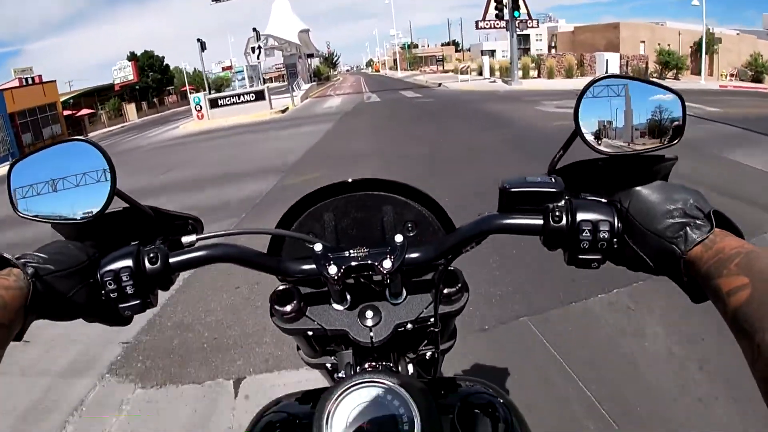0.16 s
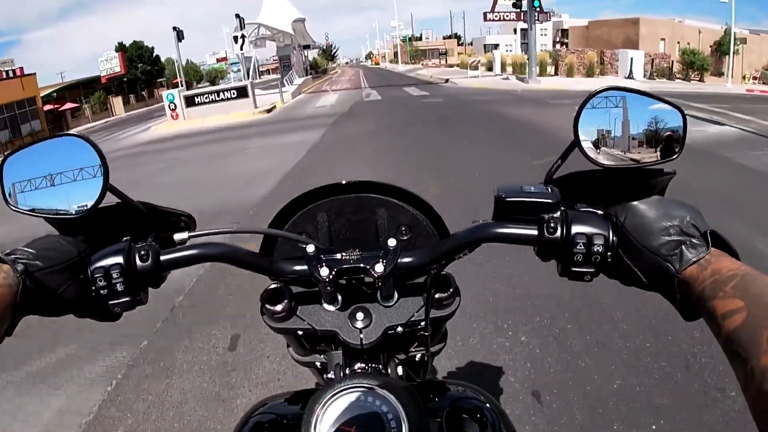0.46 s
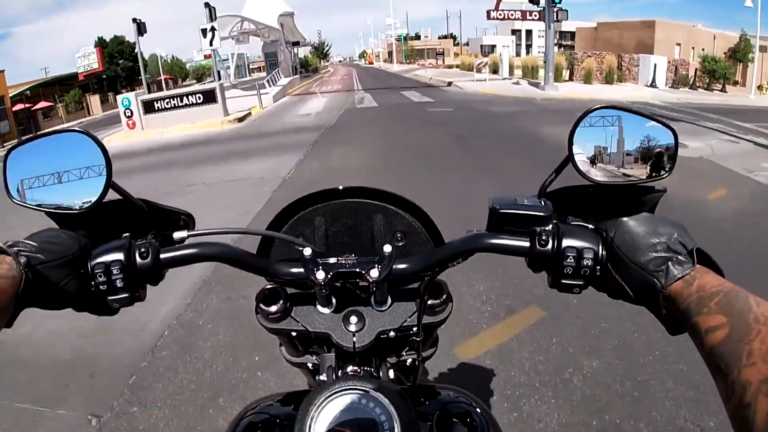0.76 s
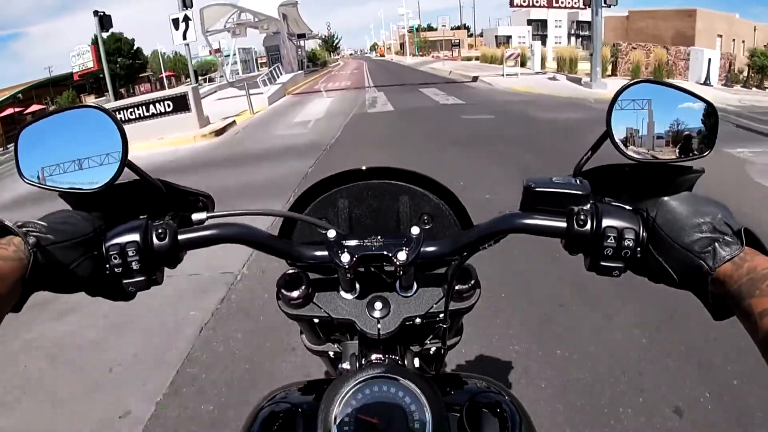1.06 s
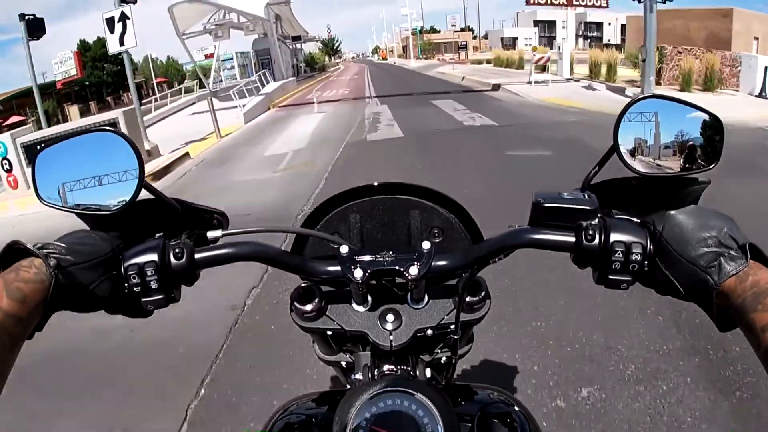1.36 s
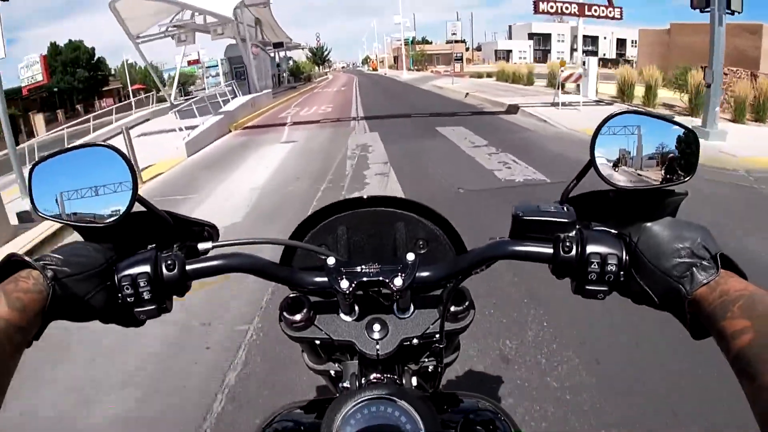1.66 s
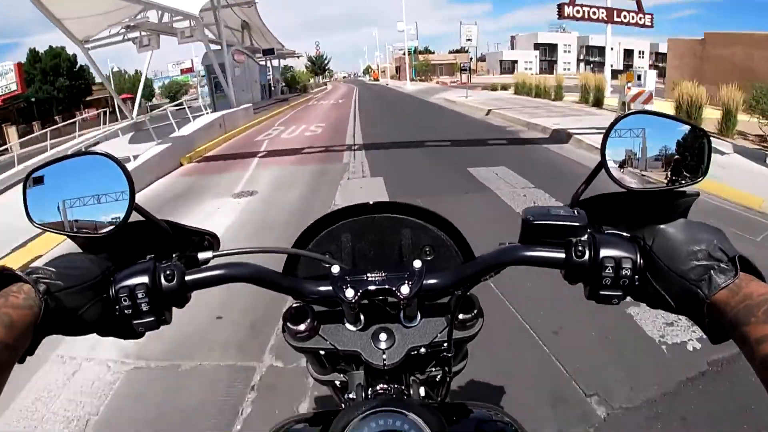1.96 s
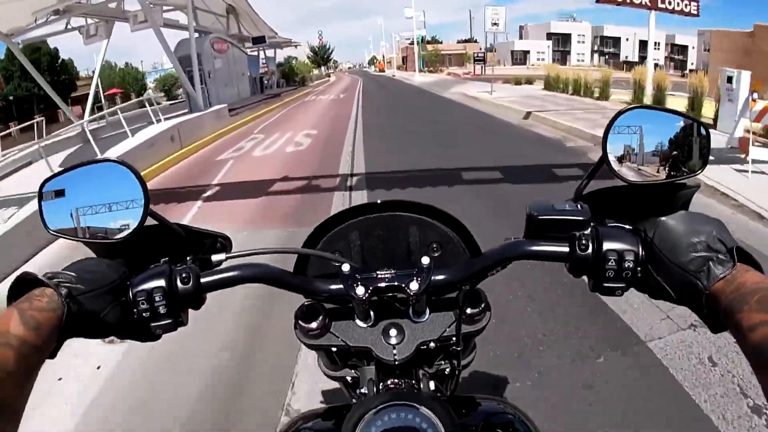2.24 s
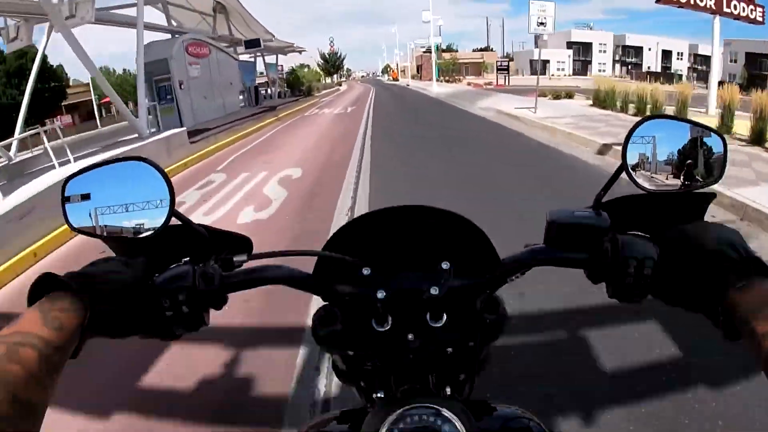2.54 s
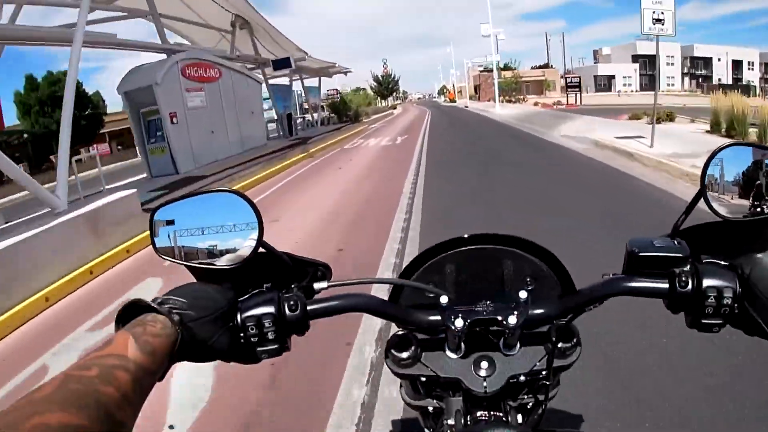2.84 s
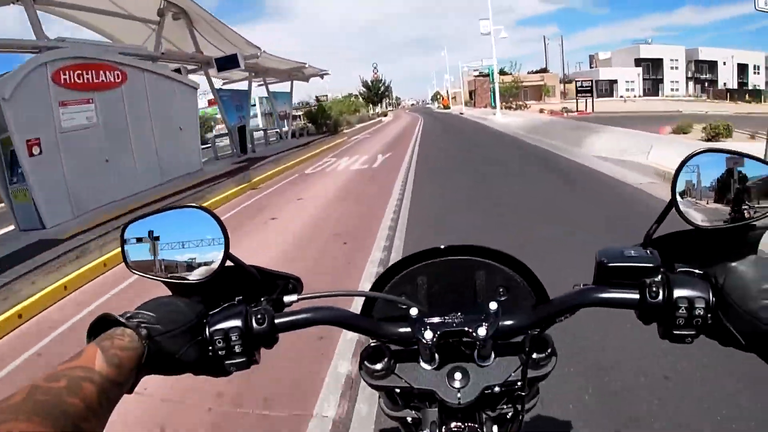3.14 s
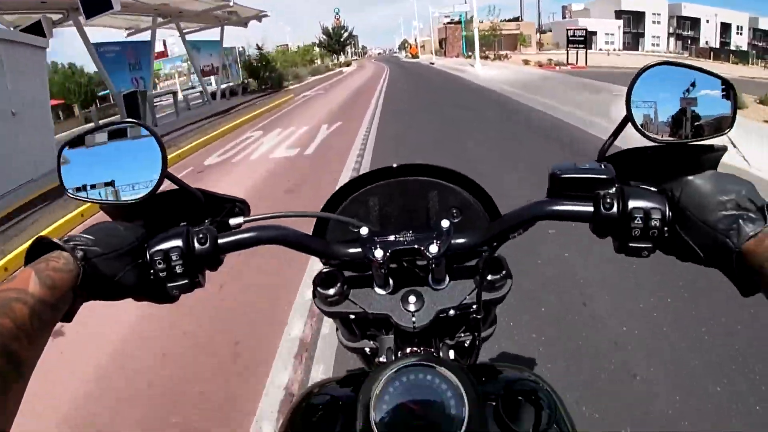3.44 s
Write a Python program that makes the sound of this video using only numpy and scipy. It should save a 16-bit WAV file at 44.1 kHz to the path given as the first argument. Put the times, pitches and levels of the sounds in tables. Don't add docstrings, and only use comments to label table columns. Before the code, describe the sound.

A big V-twin motorcycle dips briefly, then accelerates with uneven, booming exhaust beats. A second bike ticks and thumps alongside, then drops back. Wide open street, muffled close microphone in the rider's helmet, low wind and road roar.

```python
import sys
import numpy as np
from scipy import signal
from scipy.io import wavfile

SR = 44100
rng = np.random.default_rng(int(sys.argv[2]) if len(sys.argv) > 2 else 0)


def to_wav(s):
    ch = np.atleast_2d(s).T
    pcm = np.round(np.clip(ch, -1, 1) * 32767)
    wavfile.write(sys.argv[1], SR, pcm.astype(np.int16))


def attenuation_scalar(level_db):
    decades = np.asarray(level_db, float) / 20
    return 10 ** decades


N = 158760
MID_SPEED = 23
PIPES_DB, RASP_T60_S, RASP_TOP_HZ = 0.6, 0.053, 1730

# start_s, speed [four-stroke cycles per s]
OWN_SPEED = [(0.0, 14.255), (0.2, 13.282), (0.4, 12.773), (0.65, 13.299), (0.9, 13.323), (1.05, 13.985),
             (1.2, 15.125), (1.4, 16.398), (1.6, 17.247), (1.8, 18.465), (2.1, 20.194), (2.4, 21.823),
             (2.7, 23.494), (3.0, 25.316), (3.15, 26.089), (3.3, 26.918), (3.45, 27.571), (3.6, 28.444)]
# pitch_hz (when slow), t60_s,
# pitch_rise [share, as the gas heats], height_slow, height_middle, height_fast [signed]
FRONT_MODES = [(66.9, 0.074, 0.25, -0.332, -0.152, -0.135), (94.5, 0.056, 0.2, 0.507, 0.446, 0.47),
               (143.5, 0.084, 0.27, 0.255, 0.078, 0.112), (174.6, 0.043, 0.06, -0.29, -0.347, -0.396),
               (239.1, 0.03, 0.5, -0.277, -0.387, 0.011), (294.9, 0.04, 0.13, -0.095, 0.732, 0.263),
               (316.4, 0.049, 0.29, 0.339, -0.143, -0.056), (435.2, 0.031, 0.2, -0.047, 0.092, 0.179),
               (520.0, 0.057, 0.32, 0.026, -0.013, -0.121), (619.5, 0.053, 0.2, -0.016, 0.068, 0.045),
               (692.9, 0.026, 0.16, 0.104, -0.013, 0.048), (908.1, 0.031, 0.18, 0.041, 0.007, 0.015)]
REAR_MODES = [(65.8, 0.087, 0.2, -0.114, -0.09, 0.058), (91.1, 0.088, 0.2, 0.224, 0.223, 0.163),
              (157.3, 0.067, 0.03, 0.16, 0.171, 0.185), (166.7, 0.113, 0.18, -0.224, -0.176, -0.123),
              (209.0, 0.066, 0.21, -0.224, -0.226, -0.045), (251.0, 0.059, 0.2, 0.222, 0.282, 0.198),
              (351.0, 0.041, 0.16, -0.072, -0.057, -0.007), (415.7, 0.033, 0.2, 0.002, 0.066, 0.167),
              (500.0, 0.044, 0.2, 0.008, -0.119, -0.144), (606.6, 0.04, 0.2, -0.046, 0.047, 0.047),
              (634.5, 0.092, 0.03, -0.011, 0.003, -0.022), (808.9, 0.091, 0.1, -0.003, -0.004, -0.026)]
# pitch_hz, level_db [per Hz]
RASP_COLOUR = [(250, -40.5), (420, -13.5), (455, -6.5), (554, -7.5), (659, -6.5), (835, -11), (1640, -21.5),
               (2100, -34.5), (2730, -48), (4620, -120)]


def cylinder(share, modes):
    fired = moments(OWN_SPEED, -.3641, share)
    slow, fast = 13, 28
    along = (np.interp(fired, *np.transpose(OWN_SPEED)) - slow) / (fast - slow)
    strength_db = 2 * rng.standard_normal(len(fired))
    return attenuation_scalar(PIPES_DB) * blow(fired, along, modes), train(fired, attenuation_scalar(strength_db))


def own_bike():
    front, front_clicks = cylinder(0, FRONT_MODES)
    rear, rear_clicks = cylinder(.3868, REAR_MODES)
    faster = in_time(OWN_SPEED) - MID_SPEED
    bursts = puff(front_clicks + rear_clicks, RASP_T60_S)
    rasp = attenuation_scalar(-43 - 0.28 * faster) * bursts * coloured(RASP_COLOUR, patchy_db=3)
    engine_cover = cover(3800, width_hz=240, level_db=-68.5)
    silencer = cover(1700, width_hz=120, level_db=-66)
    singing = attenuation_scalar(1.3 * faster) * (engine_cover + silencer)
    return front + rear + low_pass(rasp, RASP_TOP_HZ) + singing


# start_s, speed [cycles per s]
OTHER_SPEED = [(0.0, 17.69), (0.3, 17.707), (0.6, 18.06), (0.9, 18.451), (1.2, 18.963), (1.4, 18.835),
               (1.6, 18.75), (1.9, 18.309), (2.2, 19.691), (2.6, 20.976), (3.1, 22.459), (3.6, 24.175)]


def other_firings():
    return np.concatenate([other_moments(share) for share in (0, .427)])


def other_moments(share):
    return moments(OTHER_SPEED, -.3444, share)


# share [of a cycle], level_db
VALVE_TICKS = [
    (.097, .1),
    (.301, -2),
    (.511, -1.5),
    (.696, -1.5),
]


def tick_gate():
    clicks = 0
    for share, db in VALVE_TICKS:
        s = other_moments(share)
        late_s = .0004 * rng.standard_normal(len(s)) - .002
        clicks = clicks + train(s + late_s, attenuation_scalar(db + 1.5 * rng.standard_normal(len(s))))
    return puff(clicks, t60=.018)


# pitch_hz, t60_s, pitch_rise [share],
# height_near, height_halfway, height_far [signed]
OTHER_MODES = [(90.8, 0.12, 0.2, 0.092, 0.039, 0.039), (159.4, 0.12, 0.03, 0.012, -0.024, 0.013),
               (208.0, 0.119, 0.19, 0.057, 0.022, 0.007), (261.2, 0.014, 0.17, -0.44, -0.205, -0.036),
               (304.0, 0.064, 0.11, 0.093, 0.032, 0.003), (438.1, 0.008, 0.29, -0.264, -0.283, -0.079),
               (611.5, 0.035, 0.03, -0.107, -0.094, -0.031), (630.0, 0.022, 0.12, 0.113, -0.032, -0.041),
               (696.4, 0.044, 0.15, 0.034, -0.003, 0.019), (737.4, 0.029, 0.03, 0.034, 0.081, 0.019)]
# pitch_hz, t60_s, height
SHELL = [
    (178.3, 0.18, -0.053),
    (309, 0.23, 0.028),
]


def other_exhaust(fired, change_db):
    thumps = attenuation_scalar(PIPES_DB) * blow(fired, fired / 3, OTHER_MODES)
    gas = low_pass(coloured(RASP_COLOUR, patchy_db=2), RASP_TOP_HZ)
    rasp = attenuation_scalar(-43.5 + 1.27 * change_db) * puff(train(fired, 1), RASP_T60_S) * gas
    near = train(fired, np.clip(1 - (fired / 2.85) ** 2, 0, 1))
    shell = sum(height * ring(near, hz, t60) for hz, t60, height in SHELL)
    return thumps + rasp + shell


# start_s, level_db
OTHER_LEVEL = [
    (0.1, -52),
    (0.59, -52),
    (1.96, -55),
    (2.12, -56.5),
    (3.21, -65),
    (3.5, -63.5),
]
# pitch_hz, level_db [per Hz]
TICK_COLOUR = [(1240, -34), (2100, -7.5), (2900, -9), (3550, -6.5), (4000, -8), (4590, -4), (6550, -7.5),
               (7700, -15), (8900, -9), (10100, -28.5), (13100, -47), (22000, -120)]
CLATTER_COLOUR = [(1240, -39.5), (2100, -8), (3300, -12), (3760, -9), (4170, -11), (5200, -10),
                  (6400, -11.5), (7600, -16), (8950, -18.5), (10000, -31.5), (13000, -42.5), (22000, -120)]
# pitch_hz, width_hz, level_db
ROCKER_COVERS = [
    (6460, 830, -67),
    (8900, 900, -76),
]


def other_bike():
    level_db = in_time(OTHER_LEVEL)
    change_db = level_db - level_db.mean()
    gate = tick_gate()
    valves = attenuation_scalar(level_db - 2) * gate * coloured(TICK_COLOUR, patchy_db=2)
    clatter = attenuation_scalar(-62 + 0.54 * change_db) * coloured(CLATTER_COLOUR, patchy_db=2)
    rockers = (0.48 + 0.79 * gate) * sum(cover(*row) for row in ROCKER_COVERS)
    swell_db = 7.5 * np.exp(-((np.arange(N) / SR - .7) / 0.22) ** 2)
    singing = attenuation_scalar(change_db + swell_db) * (0.4 + 0.13 * gate) * cover(3550, width_hz=380, level_db=-64)
    return valves + other_exhaust(other_firings(), change_db) + rockers + clatter + singing


def wind():
    buffet = rms_one(low_pass(rng.standard_normal(N + SR), 40)[SR:])
    faster = in_time(OWN_SPEED) - MID_SPEED
    return attenuation_scalar(-39.5 - 0.5 * faster + 3 * drift(5.4)) * buffet


# pitch_hz, level_db [per Hz]
ROAR_COLOUR = [(12, -32), (20, -24), (97, -20.5), (177, -20), (311, -4), (442, -12), (640, -10),
               (1290, -26), (2100, -45), (2730, -84.5), (4620, -120)]


def road():
    return attenuation_scalar(-36) * low_pass(coloured(ROAR_COLOUR, patchy_db=3), 1730)


def moments(speed, start_cycle, share):
    cycles = start_cycle + np.cumsum(in_time(speed)) / SR
    return np.interp(np.arange(-1, 90) + share, cycles, np.arange(N) / SR, -1, -1)


def blow(s, along, modes):
    chance = rng.standard_normal((len(s), 2 + len(modes)))
    s, along = s + .00004 * chance[:, 0], np.clip(along, 0, 1)
    after = np.arange(SR // 12) / SR
    rise = 1 - np.exp(-after / .002)
    rings = 0
    for k, (hz, t60, pitch_rise, *heights) in enumerate(modes):
        spread_db = .6 * chance[:, 1] + .6 * chance[:, 2 + k]
        height = np.interp(along, [0, .5, 1], heights) * attenuation_scalar(spread_db)
        tone = np.sin(2 * np.pi * hz * np.outer(1 + pitch_rise * along, after))
        rings = rings + height[:, None] * tone * attenuation_scalar(-60 * after / t60) * rise
    at = np.round(s * SR).astype(int)[:, None] + np.arange(len(after))
    heard = (at >= 0) & (s > -.5)[:, None]
    return low_pass(np.bincount(at[heard], rings[heard], N + SR)[:N], 1370)


def cover(hz, width_hz, level_db):
    t60 = 2.2 / width_hz
    singing = ring(ring(rng.standard_normal(N), hz, t60), hz, t60)
    return attenuation_scalar(level_db + 2.5 * drift(25)) * rms_one(singing)


def train(s, gain):
    at = np.round(s * SR).astype(int)
    inside = (at >= 0) & (at < N)
    return np.bincount(at[inside], (gain + 0 * s)[inside], N) + 1e-18


def ring(clicks, hz, t60):
    r, w = attenuation_scalar(-60 / (t60 * SR)), 2 * np.pi * hz / SR
    return signal.lfilter([0, np.sin(w)], [1, -2 * r * np.cos(w), r * r], clicks)


def puff(clicks, t60):
    r = attenuation_scalar(-60 / (t60 * SR))
    risen = signal.lfilter([1], [1, -2 * r ** 3, r ** 6], clicks)
    return rms_one(signal.lfilter([1], [1, -r], risen))


def coloured(spectrum, patchy_db):
    hz, db = np.transpose(spectrum)
    edges = hz[0] * 2 ** np.arange(0, np.log2(hz[-1] / hz[0]), 1 / 3)
    white, out = rng.standard_normal((2, N)), 0
    for k, (low, high) in enumerate(zip(edges, edges[1:])):
        sos = signal.butter(2, [low, high], "band", fs=SR, output="sos")
        band = signal.sosfilt(sos, white[k % 2])
        level_db = np.interp(np.log(low * high) / 2, np.log(hz), db)
        out = out + band * attenuation_scalar(level_db + patchy_db * drift(8.2))
    return rms_one(out)


def drift(rate_hz):
    r = np.exp(-2 * np.pi * rate_hz * 40 / SR)
    chance = rng.standard_normal(N // 40 + 2002)
    slow = rms_one(signal.lfilter([1], [1, -2 * r, r * r], chance)[2000:])
    return np.interp(np.arange(N) / 40, np.arange(len(slow)), slow)


def in_time(rows):
    return np.interp(np.arange(N) / SR, *np.transpose(rows))


def low_pass(x, hz):
    return signal.sosfilt(signal.butter(4, hz, fs=SR, output="sos"), x)


def rms_one(x):
    return x / np.sqrt(np.mean(x ** 2) + 1e-20)


def scene():
    bass_cut = signal.butter(1, 16, "high", fs=SR, output="sos")
    bikes = signal.sosfilt(bass_cut, own_bike() + other_bike())
    return (bikes + wind() + road())[None]


def top_cut(x):
    return signal.sosfilt(signal.butter(12, 12800, fs=SR, output="sos"), x)


def record(dry):
    rounded = .62 * np.tanh(dry / .62)
    return top_cut(low_pass(rounded, 7510))


dry = scene()
out = record(dry)
to_wav(out)
```